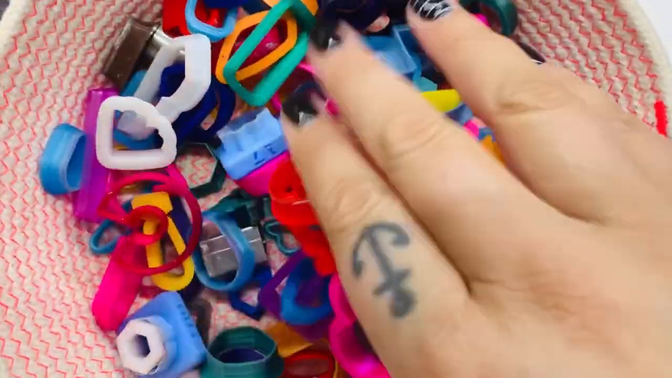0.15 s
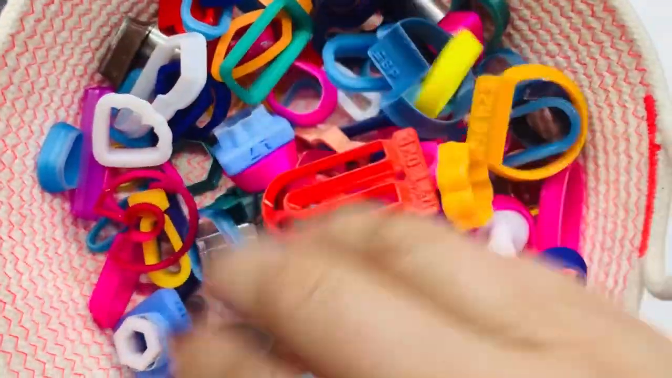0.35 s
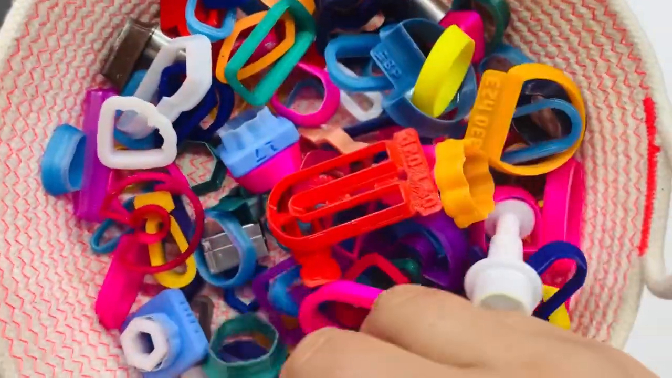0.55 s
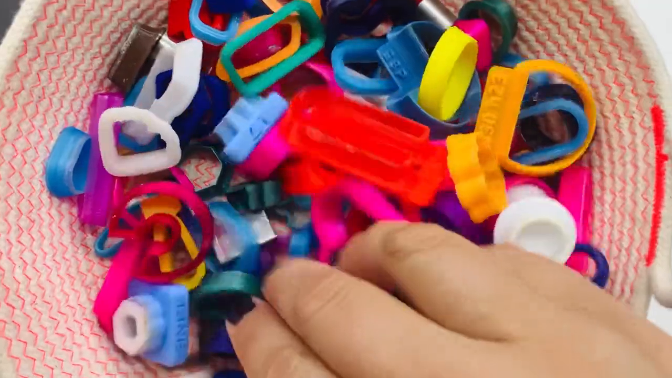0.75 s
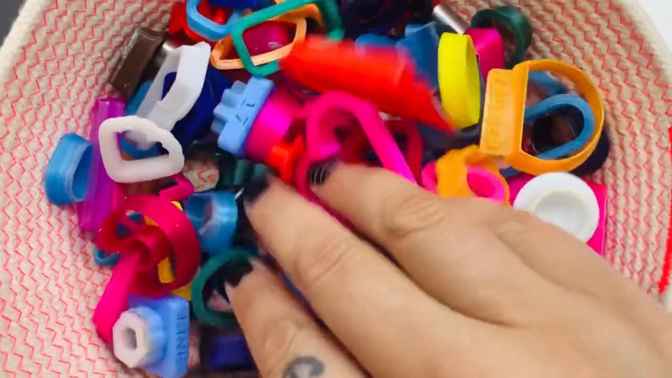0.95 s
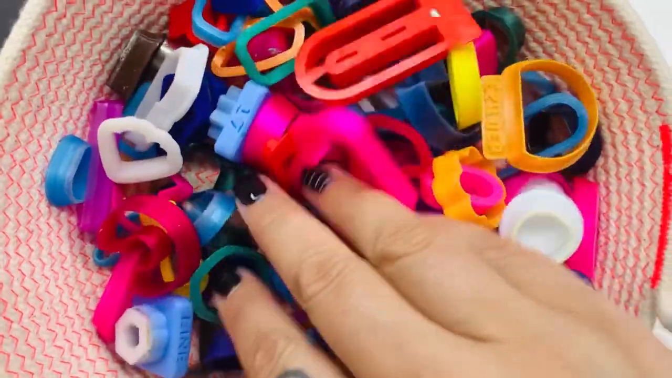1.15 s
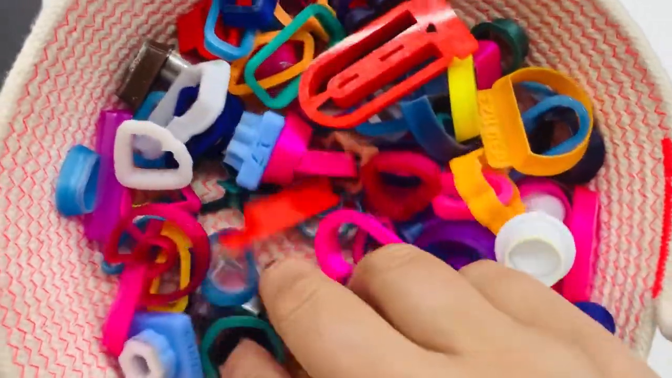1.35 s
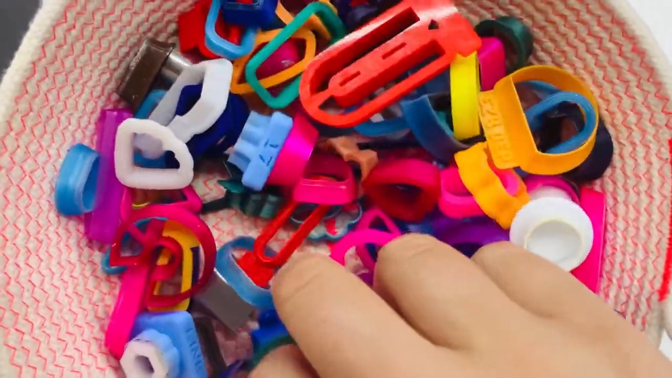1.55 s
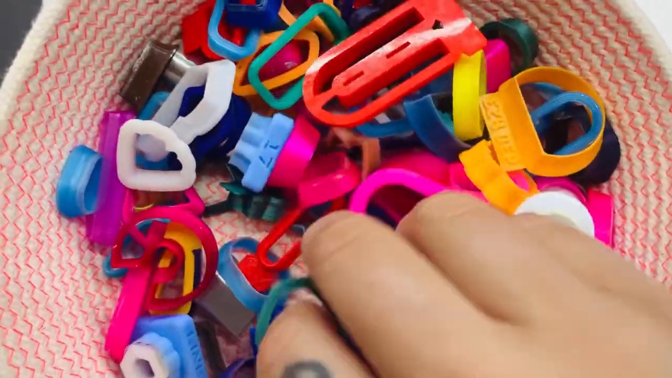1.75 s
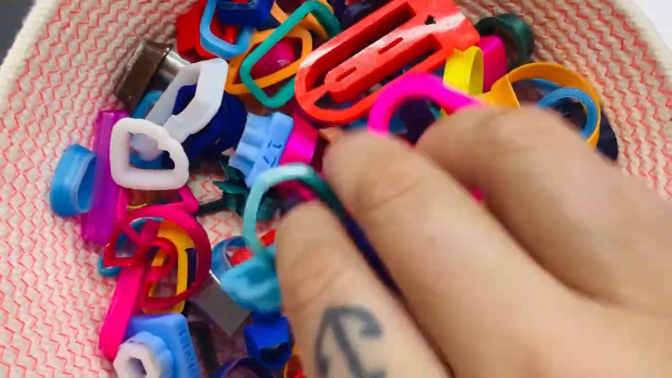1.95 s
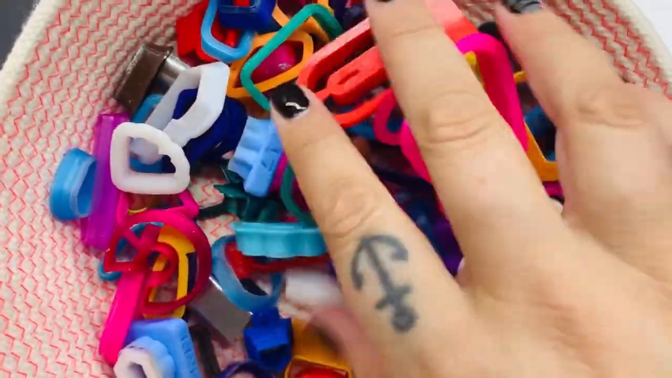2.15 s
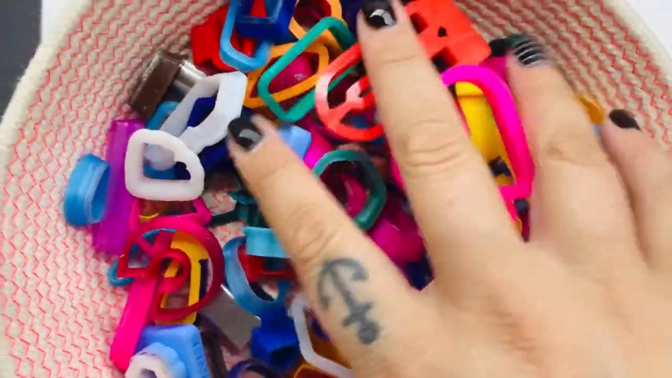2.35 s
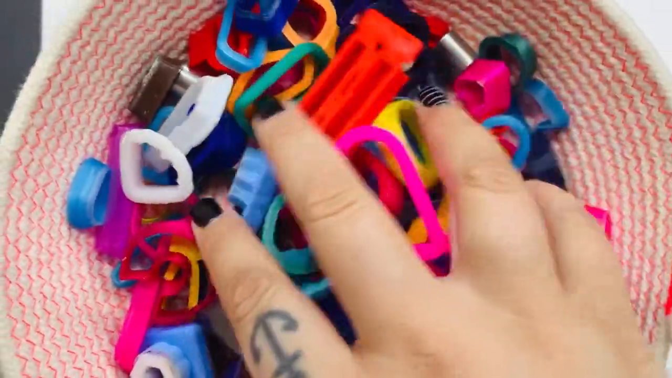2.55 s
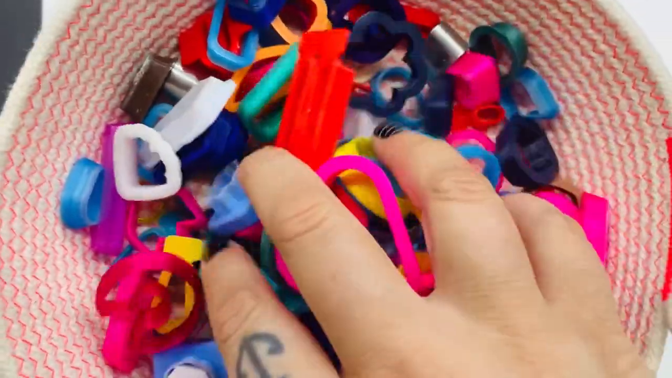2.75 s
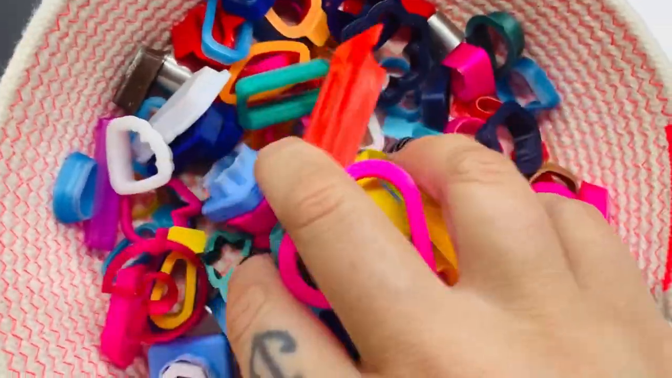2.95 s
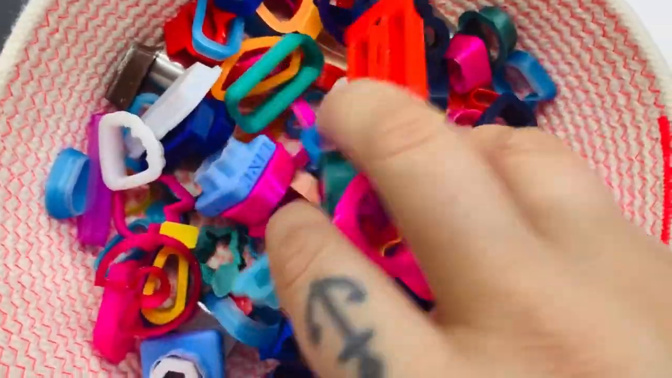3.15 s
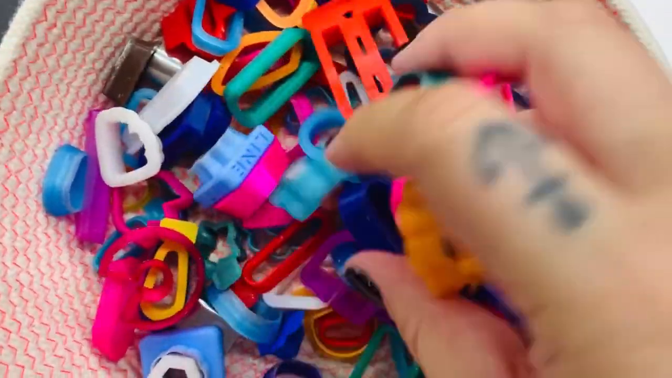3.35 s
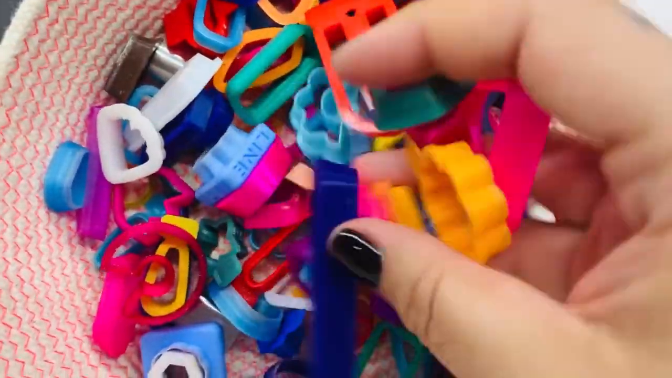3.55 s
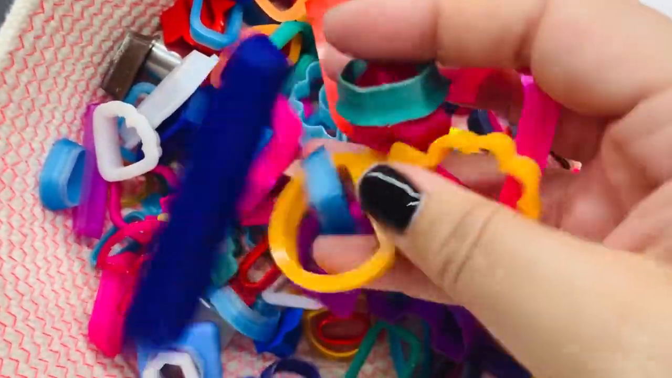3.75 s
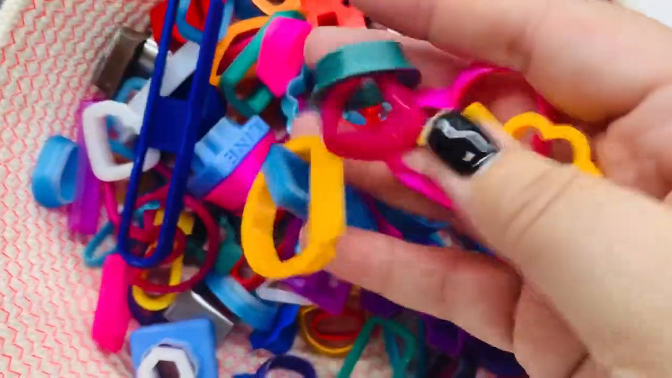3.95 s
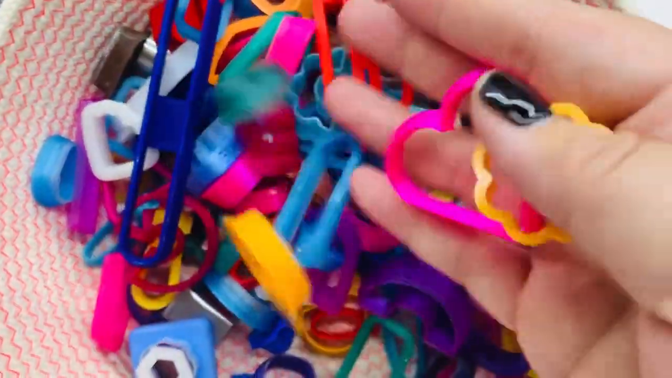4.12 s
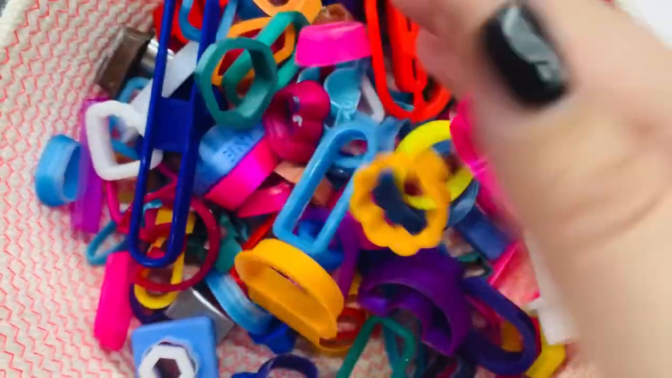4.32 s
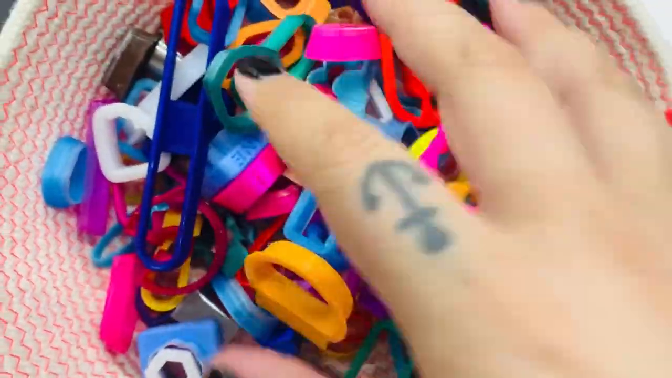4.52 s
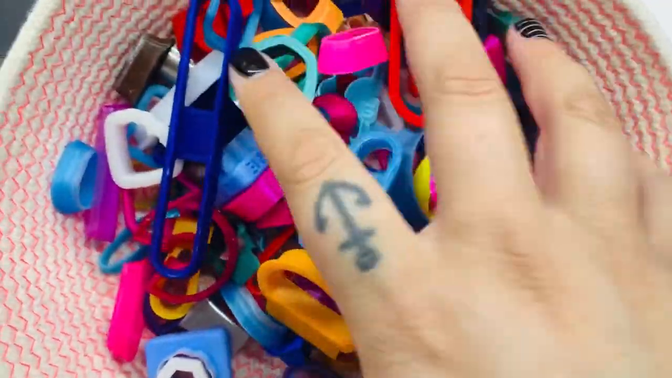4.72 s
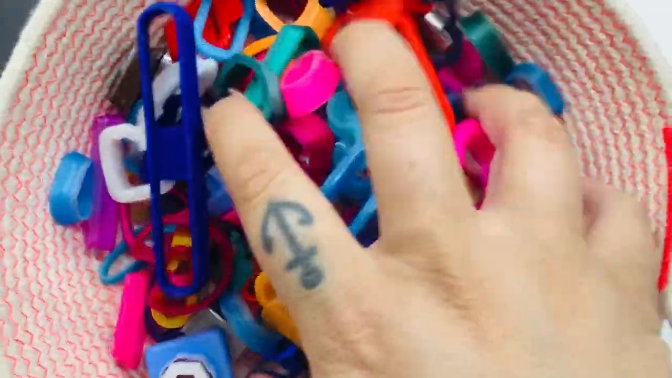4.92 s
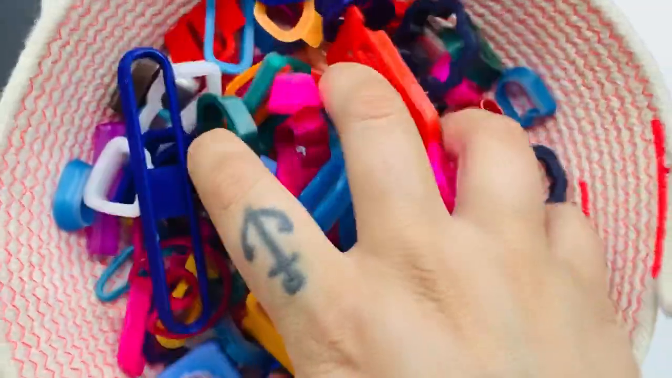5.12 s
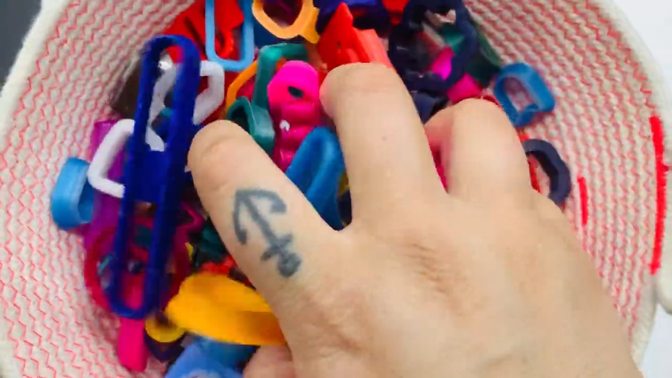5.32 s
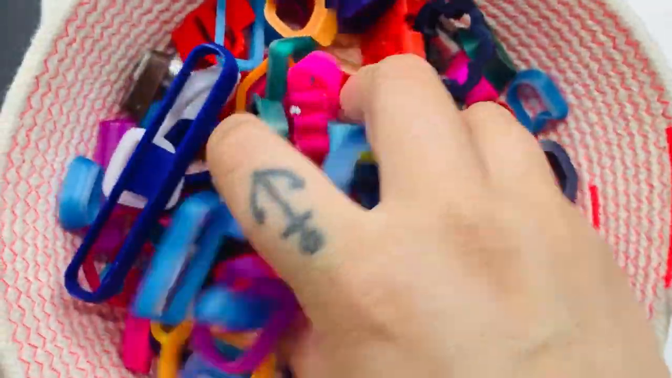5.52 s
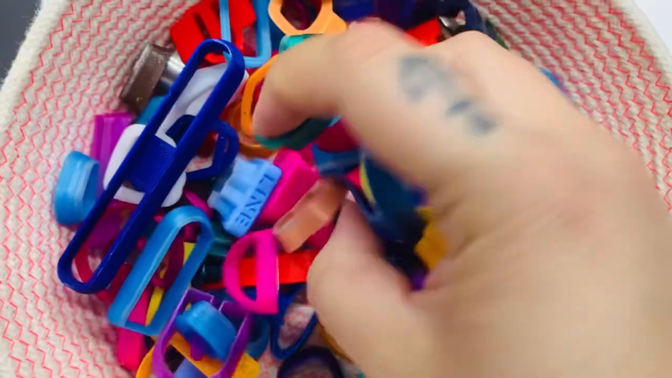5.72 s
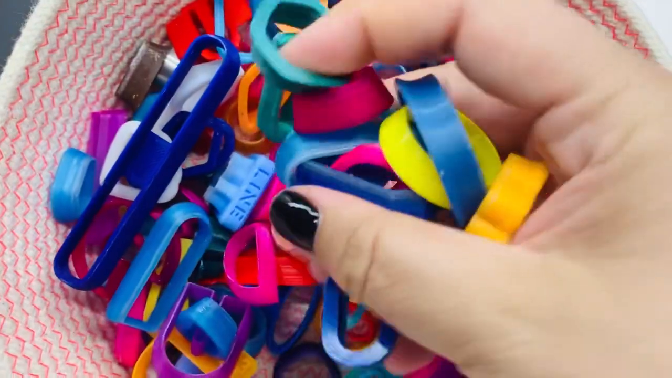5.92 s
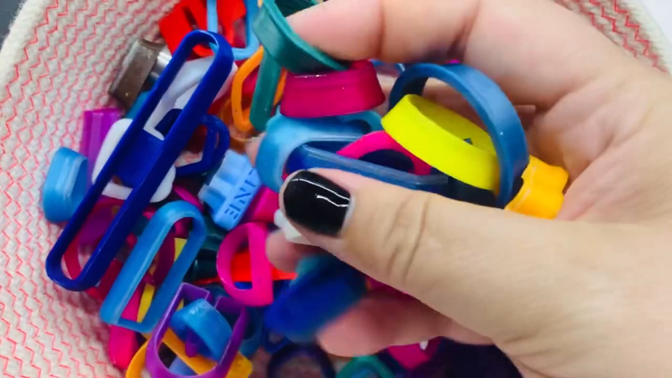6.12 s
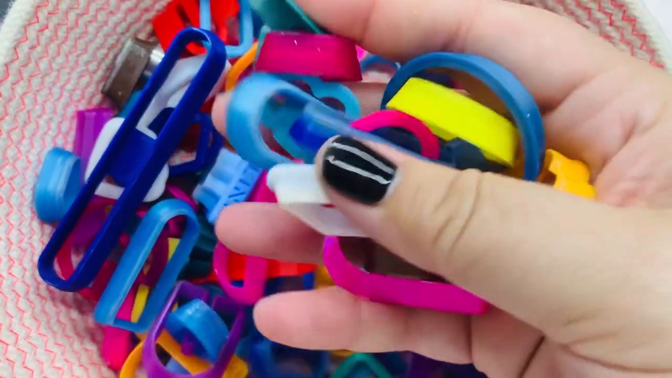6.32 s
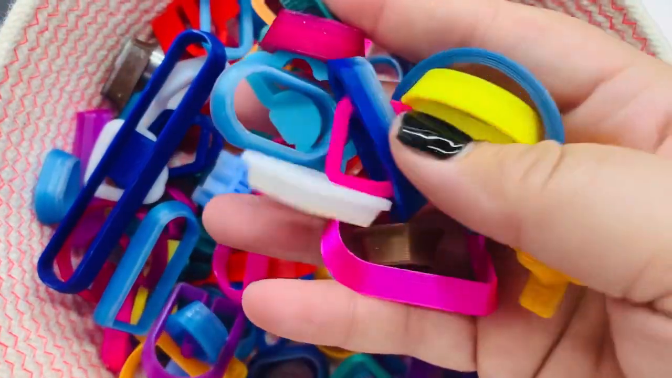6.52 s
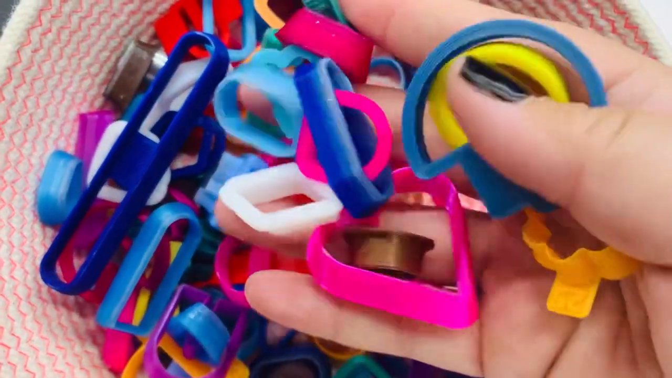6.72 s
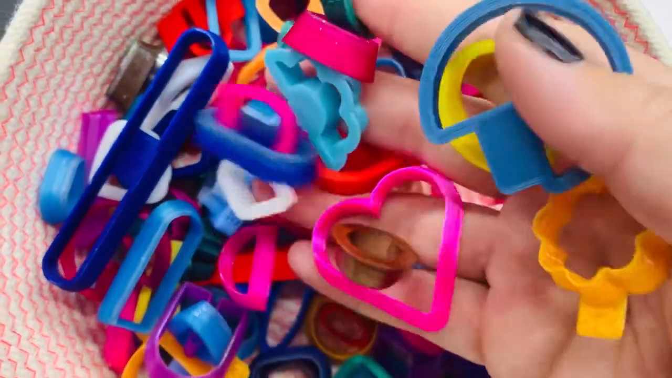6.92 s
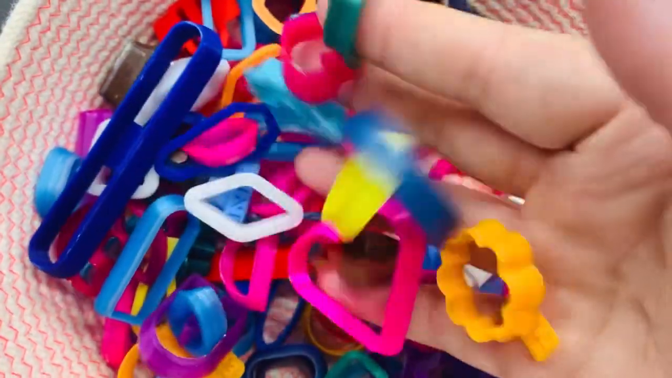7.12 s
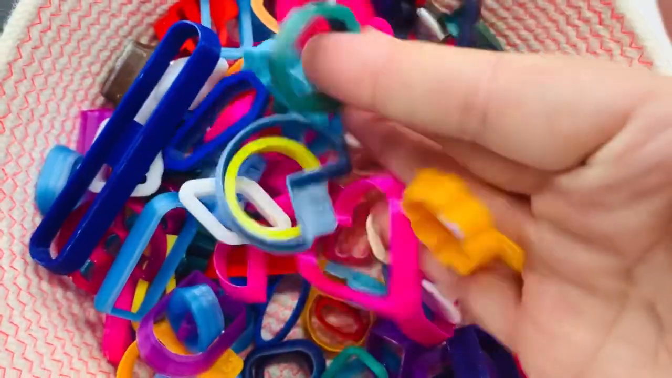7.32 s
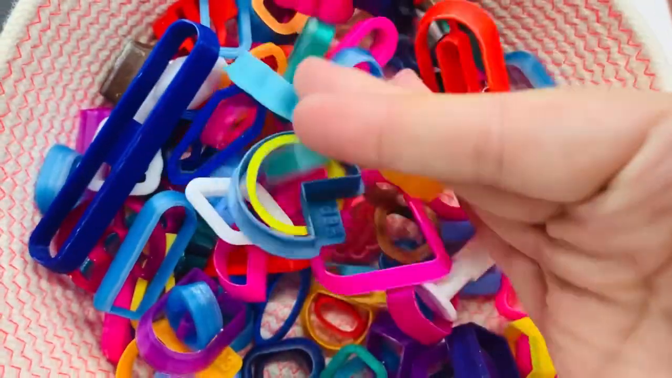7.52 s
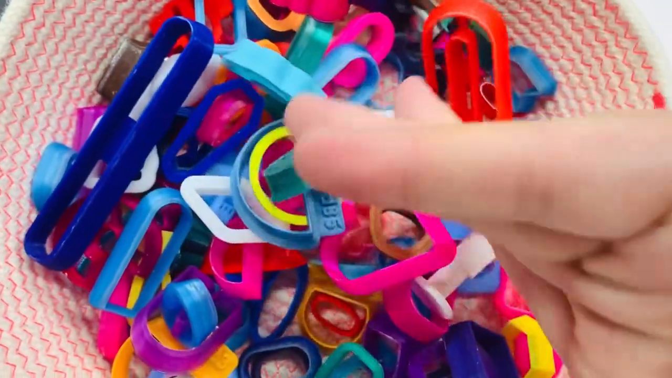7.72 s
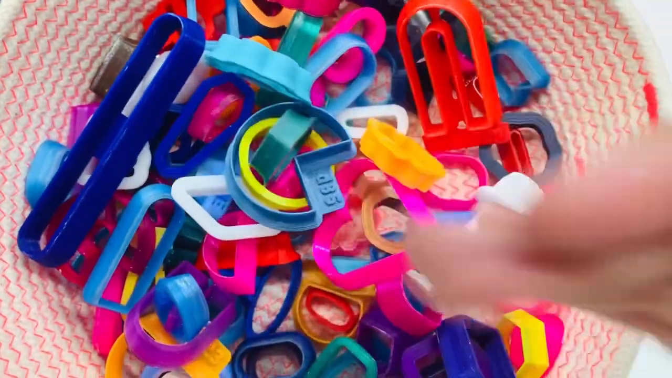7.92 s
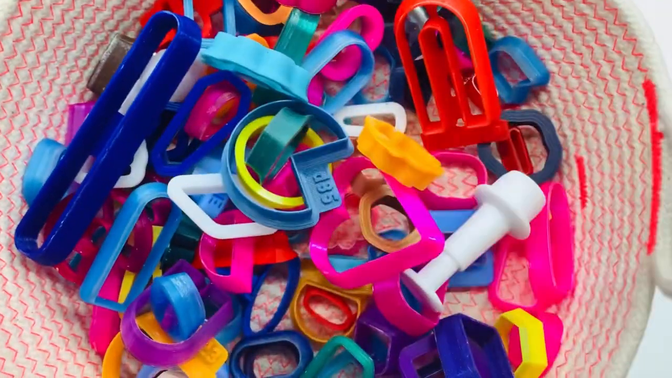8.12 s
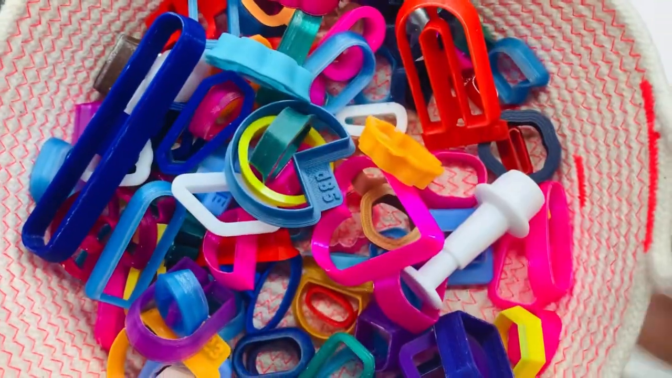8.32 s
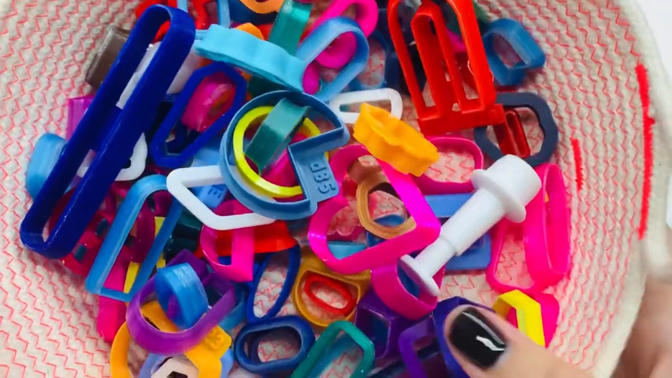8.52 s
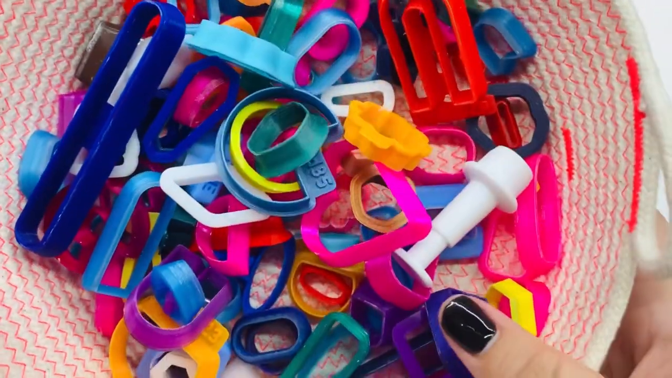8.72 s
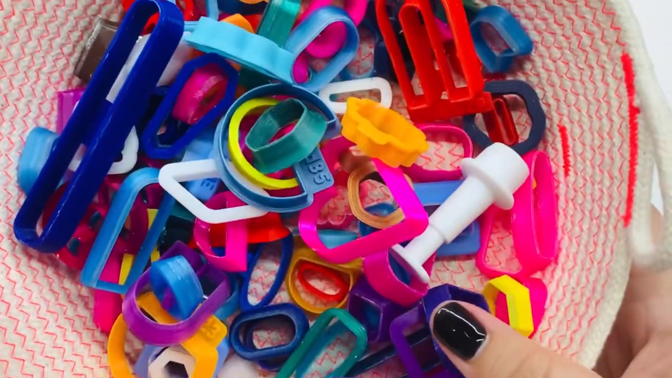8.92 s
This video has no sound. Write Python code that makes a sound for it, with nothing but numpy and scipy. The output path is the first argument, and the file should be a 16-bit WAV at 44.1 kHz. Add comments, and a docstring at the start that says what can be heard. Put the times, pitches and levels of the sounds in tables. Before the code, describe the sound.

Dense, bright plastic rattling from a basket heard very near, with almost no echo. Irregular strokes of stirring mix sharp snaps with hollow clacks and soft low thuds on the fabric bottom. Pieces tumble from the hand, are churned again, scooped, loosely jostled and dropped. The clatter stops, leaving low room noise and a barely audible rub as the hand returns.

```python
"""Stirring a basket of plastic cutters

A hand stirs a pile of plastic clay cutters in a soft rope basket, scoops some up and lets them drop, close by.
Every blow excites damped modes of a thin rim, a hollow wall and the pile beneath; stirring is a shower of
small contacts. A few cutters ring freely, and the hand brushes the basket as it leaves and comes back.
The room is small, dry and quiet: a short diffuse tail and low, steady noise."""
import sys
import numpy as np
from scipy import signal
from scipy.fft import rfft, irfft, next_fast_len
from scipy.io import wavfile
from scipy.ndimage import uniform_filter1d, map_coordinates

SR = 44100
rng = np.random.default_rng(int(sys.argv[2]) if len(sys.argv) > 2 else 0)


def wrap_up_sound(samples):
    """Save the sound to the file named by the first command line argument, as 16-bit audio."""
    columns = np.atleast_2d(samples).T
    # keep every value between -1 and 1, then stretch to whole-number steps
    tamed = np.clip(columns, -1, 1)
    steps = np.round(tamed * 32767).astype(np.int16)
    wavfile.write(sys.argv[1], SR, steps)


N = 395560  # length of the scene in samples
LIFE = 2048  # length of one short blow in samples
AGE = np.arange(LIFE) / SR  # time since the blow, s
GRID_HZ = np.fft.rfftfreq(2 * LIFE, 1 / SR)


def amp(db):
    """Level to amplitude: 20 dB is a factor of ten."""
    return 10 ** (np.asarray(db) / 20)


def unit(x):
    """Energy normalisation: each row is scaled to a sum of squares of 1."""
    return x / np.sqrt(np.sum(x ** 2, axis=-1, keepdims=True) + 1e-20)


def along(points, hz):
    """Spectral envelope: (Hz, value) points interpolated along a logarithmic frequency axis."""
    point_hz, values = np.transpose(points)
    return np.interp(np.log(hz + 1), np.log(point_hz + 1), values)


def filtered(x, response):
    """Linear filtering: the spectrum of x is multiplied by a complex response of frequency."""
    size = next_fast_len(N + SR // 4)
    spectrum = rfft(x, size) * response(np.fft.rfftfreq(size, 1 / SR))
    return irfft(spectrum, size)[..., :N]


def coloured(x, db):
    """Minimum-phase filtering: folding the cepstrum makes a causal filter from dB on the frequency grid."""
    cepstrum = irfft(np.log(amp(db)))
    cepstrum[..., 1:LIFE] *= 2
    cepstrum[..., LIFE + 1:] = 0
    response = np.exp(rfft(cepstrum))
    return irfft(rfft(x, 2 * LIFE) * response)[..., :LIFE]


def add(track, s, sound, pan_db=0):
    """Superposition: a sound joins a stereo track at s seconds; pan_db is left minus right."""
    part = track[:, max(round(s * SR), 0):][:, :len(sound)]
    part += amp([[pan_db / 2], [-pan_db / 2]]) * sound[:part.shape[1]]


def clatter():
    """Impact excitation: cutters snap past each other or land, each blow sounding rim, wall and pile at once."""
    # single contacts that stand out, from hard snaps to faint ticks, levels before the part trims:
    # start_s, click_db, knock_db, rim_pitch_hz
    hits = [(0.056, -23, -39.5, 9650), (.123, -29, -35, 9210), (.192, -24, -52.5, 9750),
            (.317, -29, -35.5, 5140), (0.454, -49, -59.5, 5740), (.592, -19, -26, 11030),
            (0.623, -21.5, -47.5, 9710), (.629, -22.5, -48, 6150), (0.892, -29, -39, 6530),
            (1.013, -30, -43.5, 4570), (1.053, -32, -56.5, 8300), (1.104, -33.5, -36, 7100),
            (1.176, -38, -34, 8600), (1.219, -20.5, -34.5, 7300), (1.226, -17, -31, 10300),
            (1.272, -25.5, -49, 10400), (1.369, -40.5, -36, 7400), (1.441, -32.5, -37.5, 4480),
            (1.492, -29.5, -38, 4800), (1.532, -32, -44.5, 8800), (1.643, -27, -36.5, 10640),
            (1.683, -29.5, -54.5, 8200), (1.761, -30, -43, 3720), (1.838, -25.5, -41.5, 12860),
            (1.869, -27.5, -47, 5660), (1.903, -29.5, -37, 5700), (1.977, -46, -34, 7180),
            (2.013, -19.5, -32, 12550), (2.031, -17.5, -29, 6330), (2.083, -32.5, -40.5, 5550),
            (2.134, -37.5, -26, 4700), (2.187, -28.5, -33.5, 5520), (2.4, -26.5, -37, 6520),
            (2.503, -17.5, -32, 8250), (2.513, -26.5, -28.5, 6900), (2.611, -18.5, -40, 8650),
            (2.722, -21.5, -43, 5500), (2.749, -24.5, -38, 8500), (2.769, -22.5, -43, 10340),
            (2.934, -49, -51.5, 7100), (3.148, -21.5, -41.5, 10200), (3.261, -27, -47, 5700),
            (3.306, -25.5, -28.5, 6130), (3.353, -18, -48, 9300), (3.381, -24, -38.5, 9400),
            (3.407, -29.5, -39.5, 6230), (3.471, -24.5, -58, 3560), (3.545, -26.5, -42.5, 3360),
            (3.586, -29, -49, 6550), (3.712, -22.5, -50.5, 4600), (3.72, -21, -32, 8660),
            (3.756, -14.5, -25, 10800), (3.77, -27.5, -35.5, 2920), (3.785, -13.5, -27, 8840),
            (3.825, -27, -47, 14470), (3.926, -27.5, -48.5, 7200), (3.941, -29, -61, 7235),
            (3.97, -44.5, -41, 6530), (4.011, -18, -23, 5540), (4.06, -21, -31, 8600),
            (4.093, -26.5, -27, 5300), (4.127, -25, -40, 6600), (4.174, -31.5, -43.5, 11100),
            (4.227, -23, -43, 9400), (4.236, -21.5, -33, 9400), (4.275, -25.5, -28.5, 9500),
            (4.315, -26, -30, 9250), (4.386, -21, -32, 7730), (4.662, -36.5, -50.5, 8300),
            (4.762, -40, -28, 6000), (4.885, -36, -30, 7450), (4.997, -30.5, -42.5, 4700),
            (5.14, -28, -30.5, 6260), (5.228, -17.5, -37, 12000), (5.257, -33.5, -42, 7560),
            (5.381, -28.5, -28, 6900), (5.394, -23.5, -26, 6430), (5.413, -19.5, -39, 7360),
            (5.483, -23, -44.5, 10400), (5.549, -31, -31, 5000), (5.588, -15.5, -30, 10850),
            (5.714, -23, -59.5, 5660), (5.793, -24.5, -38, 9500), (5.813, -25.5, -35, 9900),
            (5.84, -14.5, -49.5, 10160), (5.902, -25, -37.5, 8500), (5.917, -24, -38, 4500),
            (5.976, -47.5, -38, 6040), (5.991, -26.5, -37.5, 8900), (6.064, -24.5, -65, 9700),
            (6.106, -17.5, -35.5, 10500), (6.157, -18, -24.5, 4600), (6.198, -27.5, -34.5, 7950),
            (6.29, -35.5, -44, 10300), (6.396, -24.5, -62, 6060), (6.445, -36, -75.5, 11450),
            (6.469, -40.5, -78, 8300), (6.541, -43, -73, 5200), (6.587, -31, -76.5, 8650),
            (6.671, -35.5, -72, 12000), (6.697, -30.5, -63, 9600), (6.725, -18.5, -33.5, 8900),
            (6.749, -23.5, -33.5, 10000), (6.813, -25.5, -50, 4930), (6.878, -43.5, -40, 7000),
            (6.896, -33.5, -53, 9900), (6.918, -26, -44, 5160), (6.977, -24, -38, 10880),
            (7.012, -21, -54, 8340), (7.024, -22.5, -39.5, 8440), (7.092, -27.5, -39.5, 11025),
            (7.147, -19.5, -31, 6930), (7.174, -26.5, -35, 7160), (7.259, -30, -54.5, 14800),
            (7.291, -35, -35.5, 6500), (7.308, -25, -44.5, 6700), (7.344, -16.5, -35, 9050),
            (7.425, -22, -29.5, 11350), (7.444, -30.5, -36.5, 7280), (7.468, -37.5, -48.5, 7050),
            (7.492, -34, -43.5, 7100), (7.526, -52, -45, 6900), (7.607, -45, -42, 3345),
            (7.626, -49.5, -45, 6560), (7.744, -42.5, -57, 3770), (7.77, -57, -65, 3720),
            (7.793, -63.5, -51.5, 7260), (8.489, -50, -51.5, 3430), (8.513, -58.5, -57, 2887),
            (8.531, -58, -53.5, 7150), (8.56, -50, -54.5, 11130)]
    rim_db, wall_db, pile_db = -0.95, -14.0, -0.5  # trims of the three parts
    spread_db = 0.5  # left-right scatter
    starts, click_db, knock_db, pitch_hz = np.transpose(hits)
    count = len(starts)
    # the wall flexes with both the click and the knock
    flex_db = 0.44 * click_db + 0.47 * knock_db + wall_db
    blows = amp(click_db + rim_db)[:, None] * chatter(pitch_hz)
    blows += amp(flex_db)[:, None] * walls(count, order=6)
    blows += amp(knock_db + pile_db)[:, None] * knocks(count, order=7, thump_db=3.5)
    blows *= np.sqrt(SR / 100)  # from unit energy to unit rms over 10 ms
    track = np.zeros((2, N))
    for start, blow, pan_db in zip(starts, blows, spread_db * rng.standard_normal(count)):
        add(track, start, blow, pan_db)
    return track


def chatter(hz, count=3):
    """Contact bounce: a rim touches its neighbour in a quick run, each touch weaker and ringing it anew."""
    gap_s, loss_db = 0.0022, -9  # mean time between touches; level change at each
    pitch_share = np.full(len(hz), 0.29)  # share of the energy mixed from the rim's own pitch
    clicks, delays = np.zeros((len(hz), LIFE)), np.zeros(len(hz))
    for k in range(count):
        touches = amp(loss_db * k) * rims(hz, pitch_share, crack_t60=0.028, main_t60=0.045)
        for click, touch, delay in zip(clicks, touches, delays):
            click += np.pad(touch, (round(delay * SR), 0))[:LIFE]
        delays = delays + gap_s * (0.5 + rng.random(len(hz)))
    return unit(clicks)


def rattle(count=4200):
    """Random contact process: the harder the hand pushes the pile, the more often its pieces touch."""
    # main pitches of the cutters that rattle most: pitch_hz
    pitches = [3050, 3990, 5660, 7040, 8300, 10400, 12900]
    growth = 0.55  # dB of contact rate per dB of push
    light_touch_db = -42  # below this push the rate stays the same
    uneven_db, spread_db = 2, 2  # scatter in strength; scatter from left to right
    # contact times are drawn from the cumulative contact rate
    t = np.arange(0, N, 64) / SR
    touches = np.cumsum(amp(growth * np.maximum(push(t)[0], light_touch_db)))
    times = np.interp(rng.random(count), touches / touches[-1], t)
    rim_db, wall_db, pile_db = push(times)
    sizes = amp(uneven_db * rng.standard_normal(count))
    # 24 rims scattered around each main pitch
    hz = np.repeat(pitches, 24) * np.exp(0.04 * rng.standard_normal(24 * len(pitches)))
    pitch_shares = 0.5 * rng.random(len(hz))
    clicks = rims(hz, pitch_shares, crack_t60=0.024, main_t60=0.042)
    clacks = walls(count=120, order=3)
    thuds = knocks(count=120, order=4, thump_db=0)
    return (shower(times, sizes, clicks, rim_db - 0.7, spread_db)
            + shower(times, sizes, clacks, wall_db - 0.6, spread_db)
            + shower(times, sizes, thuds, pile_db - 2.0, spread_db))


def push(t):
    """Driving force: levels of rims, walls and pile in dB at times t, as strokes rise, swell and die away."""
    # strokes of the hand, levels at mid-stroke: start_s, length_s, rims_db, walls_db, pile_db
    strokes = [(0.01, 0.2, -28, -41.5, -35.5), (0.263, 0.08, -38, -46, -44.5),
               (0.483, 0.06, -42.5, -47, -39), (0.562, 0.235, -28, -39.5, -35),
               (0.809, 0.14, -33, -43.5, -41.5), (1.012, 0.17, -37, -45, -45),
               (1.179, 0.14, -29, -41.5, -35), (1.367, 0.11, -32.5, -41, -37), (1.526, 0.07, -40, -47, -48),
               (1.638, 0.16, -36, -46, -40.5), (1.833, 0.12, -33, -44.5, -41),
               (2.021, 0.04, -31, -42, -36.5), (2.098, 0.12, -30.5, -42.5, -36),
               (2.35, 0.14, -33, -38.5, -35.5), (2.47, 0.18, -29, -37.5, -35),
               (2.689, 0.08, -28, -37.5, -33), (2.816, 0.05, -36, -41.5, -38),
               (2.915, 0.076, -50, -53.5, -47.5), (3.052, 0.16, -26, -38, -33),
               (3.258, 0.08, -27, -41.5, -37.5), (3.404, 0.22, -34, -48, -42.5),
               (3.734, 0.065, -23, -42, -39), (3.869, 0.13, -39, -56.5, -56.5),
               (4.016, 0.31, -33, -45.5, -43.5), (4.396, 0.04, -29.5, -39, -36.5),
               (4.601, 0.15, -43, -46.5, -48.5), (4.809, 0.16, -21, -32, -31),
               (4.985, 0.17, -37.5, -45.5, -42.5), (5.164, 0.09, -21, -32.5, -31),
               (5.278, 0.08, -37, -44, -42.5), (5.368, 0.08, -22, -30, -29),
               (5.475, 0.025, -21, -37.5, -38), (5.5, 0.18, -27, -43, -36), (5.732, 0.22, -34, -47, -42.5),
               (6.005, 0.09, -39, -53, -48), (6.139, 0.11, -31, -49, -38.5), (6.272, 0.2, -45, -56.5, -84),
               (6.56, 0.14, -46, -63.5, -95), (6.734, 0.11, -37, -49.5, -51),
               (6.881, 0.11, -32, -44, -44.5), (7.018, 0.045, -21.5, -33, -39),
               (7.112, 0.11, -29, -38.5, -39), (7.251, 0.11, -34, -45, -42.5),
               (7.397, 0.07, -31, -42.5, -41), (7.713, 0.0603, -63.5, -62.5, -51.5),
               (8.455, 0.083, -65.5, -65, -58)]
    attack_db_per_s, release_db_per_s = 440, 368.5  # in a stroke whose rims are at firm_db
    firm_db, abruptness = -30, 0.12  # gentler strokes fade more slowly, by this many dB of speed per dB
    swell_db = 3.5  # a stroke is this much stronger in its middle than at its ends
    start, length, *levels_db = np.transpose(strokes)[:, :, None]
    fade_db = attack_db_per_s * np.maximum(start - t, 0)
    fade_db += release_db_per_s * np.maximum(t - start - length, 0)
    fade_db *= amp(abruptness * (levels_db[0] - firm_db))
    fade_db += swell_db * (1 - np.sin(np.pi * np.clip((t - start) / length, 0, 1)))
    # overlapping strokes add in power
    return [10 * np.log10(np.sum(amp(db - fade_db) ** 2, axis=0) + 1e-12) for db in levels_db]


def shower(times, sizes, bank, level_db, spread_db):
    """Power sharing: contacts close in time divide the hand's power, each on a random member of the bank."""
    count = len(times)
    sizes = sizes * amp(2 * rng.standard_normal(count))  # no two touches excite a part alike
    at = (times * SR).astype(int)
    power = np.bincount(at, sizes ** 2, N)
    power = uniform_filter1d(uniform_filter1d(power, size=1800), size=1100)
    gains = sizes / np.sqrt(np.abs(power[at]) + 1e-12) * amp(level_db)
    gains *= rng.choice([-1, 1], count)
    pieces = rng.integers(len(bank), size=count)
    pans_db = spread_db * rng.standard_normal(count)
    track = np.zeros((2, N))
    for s, gain, piece, pan_db in zip(times, gains, pieces, pans_db):
        add(track, s, gain * bank[piece], pan_db)
    return track


def rims(hz, share, crack_t60, main_t60, hump_db=6):
    """Modal resonance of thin rims: one leading pitch, the modes around it stronger than the rest."""
    # relative radiation of the rims: frequency_hz, level_db (per Hz)
    rim_colour = [(1400, -48.5), (2500, -20.5), (3500, -0.5), (5500, -3.5), (9500, -5.5), (12500, -8),
                  (15500, -11.5)]
    snap_db, snap_t60 = -2, 0.016  # extra strength just before the neighbours damp the rim; its life, s
    share = share[:, None]
    octaves = np.log2((GRID_HZ + 1) / hz[:, None])
    colour_db = along(rim_colour, GRID_HZ) + hump_db * np.exp(-(octaves / 0.29) ** 2)
    rest = struck(colour_db, 2900, 15800, cycles=330, crack_t60=crack_t60, tonal=0.62,
                  count=len(hz), order=5)
    main = unit(ring(hz, main_t60 * np.sqrt(np.median(hz) / hz)))  # higher pitches die sooner
    snap = 1 + amp(snap_db - 60 * AGE / snap_t60)
    return unit(snap * (np.sqrt(share) * main + np.sqrt(1 - share) * rest))


def walls(count, order):
    """Flexural resonance: hollow clacks of whole cutters; order is the number of modes, more for hard blows."""
    # relative radiation of the walls: frequency_hz, level_db (per Hz)
    wall_colour = [(550, -34), (820, -1), (1000, -4.5), (1170, 2), (1700, -3), (2700, -6.5), (4000, -14.5)]
    return struck(along(wall_colour, GRID_HZ), 750, 2700, cycles=70, crack_t60=0.026, tonal=0.68,
                  count=count, order=order)


def knocks(count, order, thump_db):
    """Bending-wave dispersion: low waves travel slowest, so dull knocks on the soft basket fall in pitch."""
    # relative radiation of the pile: frequency_hz, level_db (per Hz)
    pile_colour = [(40, -10.5), (90, -12.5), (170, -3.5), (300, 1.5), (390, 3.5), (445, -3), (540, 2),
                   (690, -7.5), (850, -5), (1500, -21)]
    basket_hz, basket_octaves = 190, 0.78  # thump of the whole basket: centre and width
    lag_s = 0.002036  # group delay at 300 Hz
    thump = np.exp(-(np.log2((GRID_HZ + 1) / basket_hz) / basket_octaves) ** 2)
    colour_db = along(pile_colour, GRID_HZ) + thump_db * thump
    blows = struck(colour_db, 253.4, 1134, cycles=26, crack_t60=0.017, tonal=0.5, count=count, order=order)
    bending = np.exp(-4j * np.pi * lag_s * np.sqrt(300 * GRID_HZ))
    return irfft(rfft(blows, 2 * LIFE) * bending)[:, :LIFE]


def struck(colour_db, low_hz, high_hz, cycles, crack_t60, tonal, count, order, attack_s=0.0003):
    """Modal superposition: a few clear modes over a crack of crowded, quickly damped ones, in count blows."""
    own_colour_db = 3.5  # every cutter favours some bands over others
    # a thin plate has equally many modes in every Hz
    hz = low_hz + (high_hz - low_hz) * rng.random((count, order))
    ripple = np.sin(2 * np.pi * (np.log2(GRID_HZ + low_hz) + rng.random((count, 1))))
    colour_db = colour_db + own_colour_db * ripple
    signs = rng.choice([-1, 1], (count, order, 1))
    sizes = signs * rng.uniform(0.45, 1, (count, order, 1))
    # a mode at the mean frequency falls 60 dB in the given number of cycles
    t60 = cycles / np.sqrt(hz * hz.mean())
    modes = np.sum(sizes * ring(hz, t60), axis=1)
    crack = rng.standard_normal((count, LIFE)) * amp(-60 * AGE / crack_t60)
    rise = 1 - np.exp(-AGE / attack_s)  # the vibration takes a moment to spread through the piece
    modes = unit(coloured(rise * modes, colour_db))
    crack = unit(coloured(rise * crack, colour_db))
    return unit(np.sqrt(tonal) * modes + np.sqrt(1 - tonal) * crack)


def ring(hz, t60):
    """Exponential damping: one decaying sine for each frequency."""
    return np.sin(2 * np.pi * hz[..., None] * AGE) * amp(-60 * AGE / t60[..., None])


def free_rings():
    """Free vibration: a cutter that swings clear of its neighbours' damping sings briefly at one mode."""
    # cutters that ring on: start_s, pitch_hz, level_db, t60_s
    ringing = [(0.593, 1277, -23.5, 0.064), (1.178, 3020, -32, 0.14), (1.272, 3020, -29, .08),
               (1.372, 2970, -36.5, 0.15), (1.441, 2950, -37.5, 0.1), (1.625, 3440, -30, 0.051),
               (3.407, 1754, -30, 0.074), (3.755, 2104, -31, 0.17), (3.756, 1840, -35.5, 0.26),
               (3.763, 2970, -20, 0.074), (3.927, 7190, -11, 0.016), (4.03, 2090, -35.5, 0.2),
               (4.173, 1860, -33, 0.12), (4.227, 2570, -37, 0.16), (6.236, 5180, -15, 0.032),
               (6.832, 2310, -36, 0.1), (6.897, 1840, -29, 0.15)]
    track, t = np.zeros((2, N)), np.arange(SR // 3) / SR
    for s, hz, db, t60 in ringing:
        add(track, s, amp(db - 60 * t / t60) * np.sin(2 * np.pi * hz * t))
    return track


def brushes(width_octaves=1.88):
    """Stick-slip friction: skin catching on rope and plastic gives a grainy rub, slow to swell, quicker to stop."""
    # the hand leaves the basket and comes back: start_s, length_s, level_db, centre_hz
    rubs = [(7.658, .23, -63, 620), (7.8, 0.29, -71, 5530), (8.263, 0.35, -61.5, 1504)]
    track = np.zeros((2, N))
    for s, length, db, centre_hz in rubs:
        size = int(length * SR)
        octaves = np.log2((np.fft.rfftfreq(size, 1 / SR) + 1) / centre_hz)
        band = np.exp(-(octaves / width_octaves) ** 2)
        # smooth random level with 300 points a second
        grain = map_coordinates(rng.standard_normal(256), [np.arange(size) * 300 / SR], mode="wrap")
        noise = amp(4.5 * grain) * rng.standard_normal(size)
        rub = unit(irfft(rfft(noise) * band, size)) * np.sqrt(size)
        swell = np.sin(np.pi * np.linspace(0, 1, size) ** 1.6) ** 2
        add(track, s, rub * amp(db) * swell)
    return track


def microphones(x):
    """Interchannel phase and level difference: left and right differ in phase, and below 3 kHz in level."""
    # phase by which left leads right: frequency_hz, lead_rad
    phase_lead = [(0, 0), (600, -.5), (1500, 0), (4650, 3.14), (6900, 6.28), (11100, 12.57), (16000, 20)]
    # left minus right: frequency_hz, difference_db
    level_tilt = [(50, -1.5), (200, -3.2), (700, -3.8), (1600, -2), (2500, -2.5), (3000, 0)]

    def response(hz):
        """Symmetry: left takes half of each difference, right its inverse."""
        lead = np.interp(hz, *np.transpose(phase_lead))
        half = amp(along(level_tilt, hz) / 2) * np.exp(0.5j * lead)
        return np.array([half, 1 / half])
    return filtered(x, response)


def room(x):
    """Diffuse reverberation: a short tail of decaying noise, different in each channel."""
    # decay time of the room: frequency_hz, t60_s
    decay = [(150, 0.84), (5000, 0.0063), (15000, 0.045)]
    hz, t, z = signal.stft(rng.standard_normal((2, SR // 3)), SR, nperseg=256)
    fade = amp(-60 * t / along(decay, hz)[:, None])
    tail = signal.istft(z * fade, SR, nperseg=256)[1]
    return signal.oaconvolve(x[None], unit(tail), axes=1)[:, :N]


def hush(level_db=-63, apart_db=-14):
    """Coherent background noise: a low room noise nearly the same in both channels."""
    # relative spectrum of the quiet room: frequency_hz, level_db (per Hz)
    room_colour = [(48, 1.5), (120, 9.5), (200, -14), (320, -2), (600, -29), (2000, -31.5), (15000, -38.5)]
    noise = rng.standard_normal(N) + amp(apart_db) * rng.standard_normal((2, N))
    shaped = filtered(noise, lambda hz: amp(along(room_colour, hz)))
    return amp(level_db) * np.sqrt(N) * unit(shaped)


def scene():
    """Direct and reverberant field: the basket close by, the room faint behind it."""
    cutters = clatter() + rattle() + free_rings() + brushes()
    return microphones(cutters) + amp(-18.5) * room(cutters.mean(axis=0)) + hush()


def record(dry):
    """Band limiting: the deepest bass falls away below 36 Hz and nothing remains from 15850 Hz up."""
    return filtered(dry, lambda hz: (hz < 15850) * hz ** 4 / (hz ** 4 + 36 ** 4))


dry = scene()
out = record(dry)
wrap_up_sound(out)
```